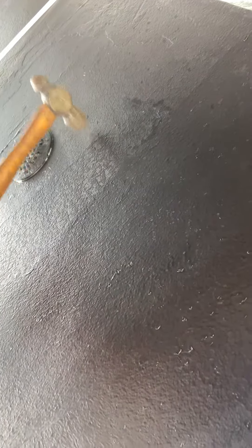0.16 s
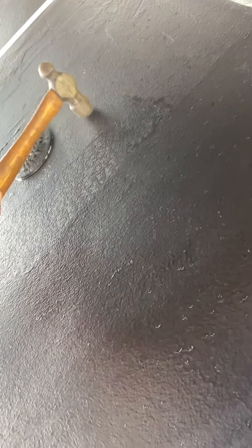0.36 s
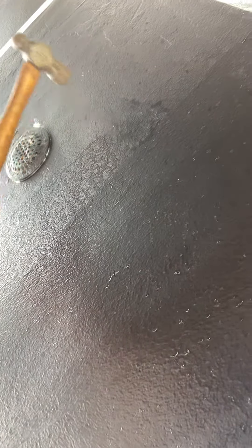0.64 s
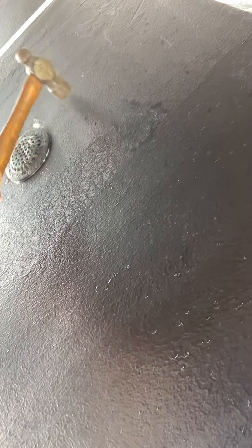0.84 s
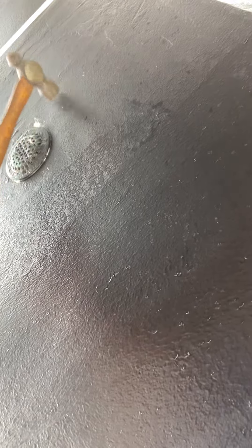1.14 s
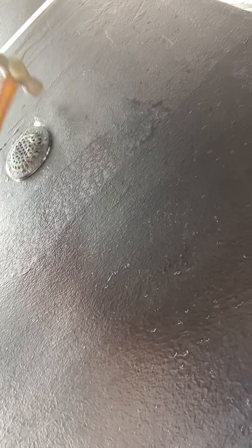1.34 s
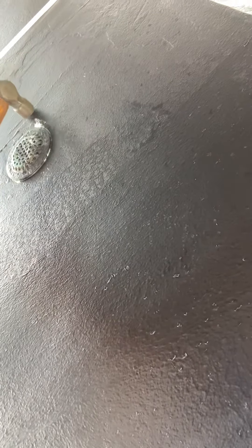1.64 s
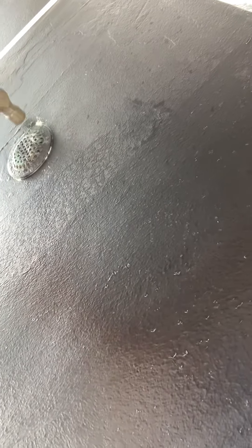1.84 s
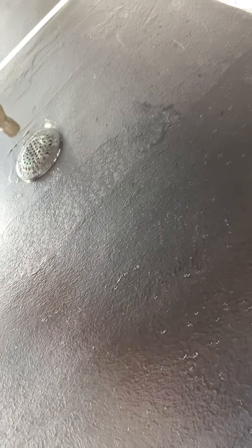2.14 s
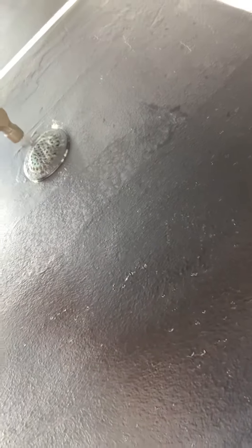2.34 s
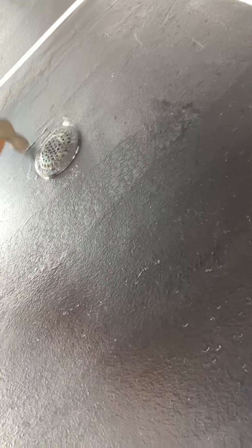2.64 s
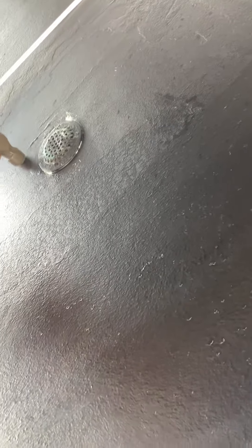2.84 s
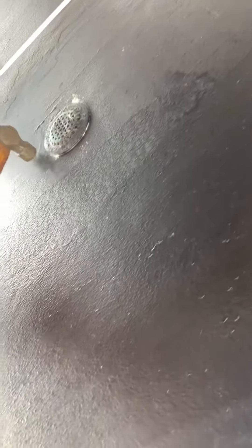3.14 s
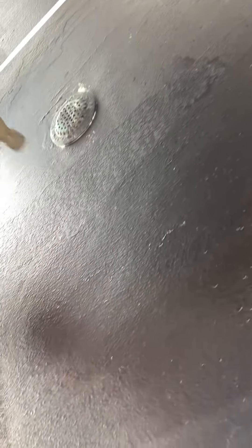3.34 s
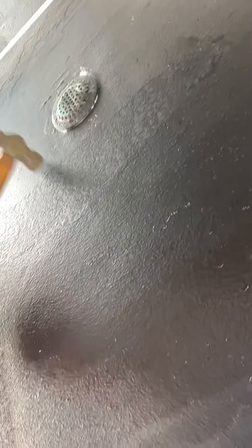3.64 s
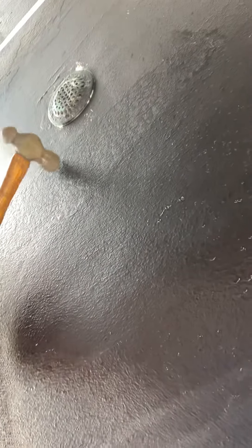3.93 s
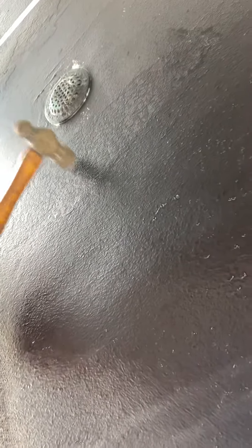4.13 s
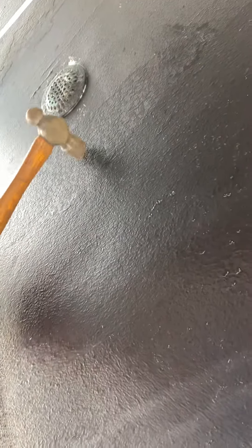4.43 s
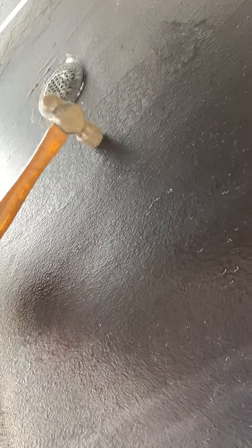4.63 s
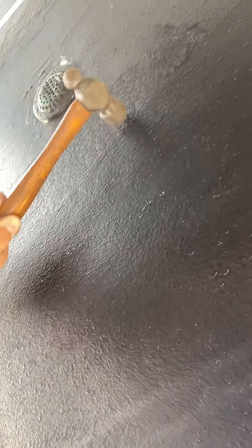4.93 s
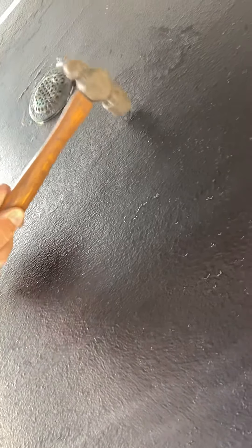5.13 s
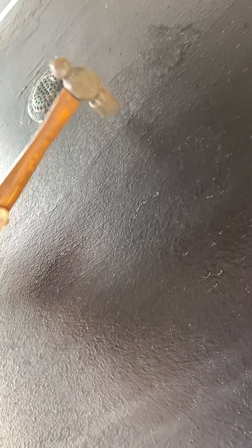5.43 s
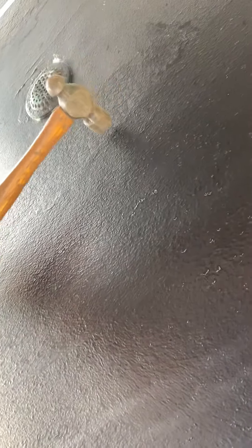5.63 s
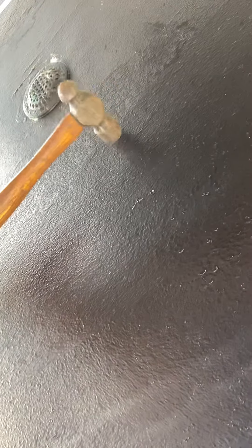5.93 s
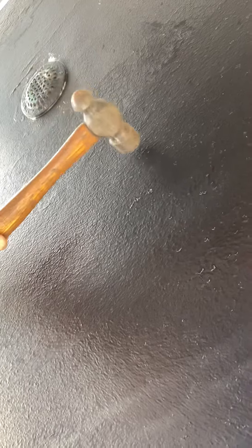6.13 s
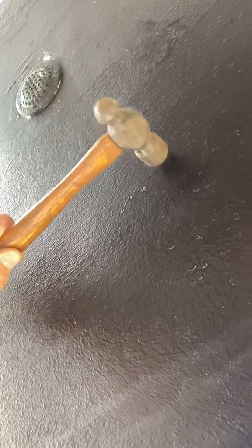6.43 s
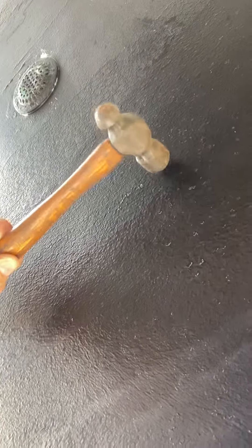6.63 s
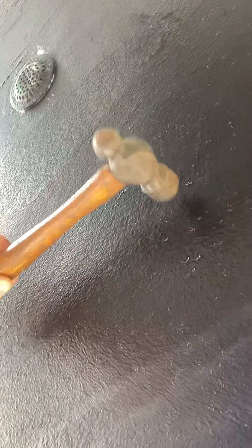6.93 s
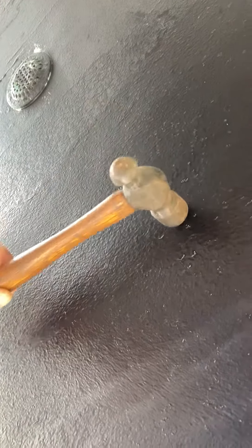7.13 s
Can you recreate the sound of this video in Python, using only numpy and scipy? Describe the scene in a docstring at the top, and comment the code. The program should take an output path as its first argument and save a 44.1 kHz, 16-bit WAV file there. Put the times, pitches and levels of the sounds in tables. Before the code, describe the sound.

A small hammer taps a fiberglass boat hull close to the microphone, about four times a second. The first knocks are dull and hollow on a loose patch, then turn brighter and harder on solid material. Past the middle they grow louder and hollow again, before firming up at the end. The head often bounces lightly after a tap, and the hull and surrounding shed ring briefly. A faint low rumble lies underneath.

```python
"""A small ball-peen hammer sounds out a fibreglass boat hull, close up, about four taps a second.
It starts on a loose, hollow patch of skin, which yields and dulls the knock. Each tap launches a bending
wave (treble first, bass late), the head often drops back, and hull and shed ring briefly. From about
2.4 s it crosses hard, solid laminate, where shorter contact brightens the knock. Near 4.8 s it finds a
second loose patch, and by 7 s it has moved off again. A low rumble lies under it all."""
import sys
import numpy as np
from scipy import signal
from scipy.fft import rfft, irfft
from scipy.io import wavfile
from scipy.ndimage import uniform_filter1d, minimum_filter1d

SR = 44100
rng = np.random.default_rng(int(sys.argv[2]) if len(sys.argv) > 2 else 0)


def store_wav(level_fs):
    """Save 16-bit WAV to argv[1]."""
    pcm = np.round(np.clip(np.atleast_2d(level_fs), -1, 1) * 32767)
    wavfile.write(sys.argv[1], SR, pcm.T.astype(np.int16))


N = 320607
SIZE = 16384  # samples in one knock
HZ = np.maximum(np.arange(SIZE // 2 + 1) * SR / SIZE, 1)
AGE = np.arange(SIZE) / SR
SIDES = np.array([[.5], [-.5]])  # splits a left-right difference between the channels

# The hammer taps. Each row: start in seconds, level in dB, gelcoat tick in dB.
TAPS = [(.0295, 5.5, -17.5), (.2661, 5, -14), (.4754, 1, -12), (.7174, -5.5, 0), (.928, 1.5, -9.5),
        (1.1439, -4.5, -3), (1.3547, -4.5, 0.5), (1.589, 5.5, -15.5), (1.8114, 6, -19),
        (2.0095, 2.5, -32.5), (2.2129, 6, -22.5), (2.4158, 1.5, -36.5), (2.6412, 2, -18.5),
        (2.8395, -3.5, -50), (3.1149, 1.5, -33), (3.3878, 1, -22), (3.641, 1.5, -41.5), (3.9021, 2.5, -33),
        (4.1264, 1, -26), (4.3736, 4, -28), (4.6158, 5.5, -13), (4.8516, 10, -17), (5.1019, 11, -18.5),
        (5.333, 4.5, -22), (5.5814, 7.5, -18), (5.8041, 9, -15.5), (6.0465, 5.5, -13), (6.2778, 4, -11.5),
        (6.5099, 1, -8), (6.7349, 3.5, -13.5), (6.963, 0.5, -10), (7.1705, 1.5, -24)]
# The head drops back on the same spot. Each row: start in seconds, level in dB relative to its tap.
REBOUNDS = [(0.3212, -4), (0.5086, -1.5), (0.957, -3.5), (.977, -10), (1.63, -9), (1.8591, -16.5),
            (2.043, -8), (2.2446, -10), (2.4485, -5), (2.6653, -8.5), (2.86, -5.5), (3.1508, -9),
            (3.9404, -14), (4.157, -13), (5.842, -7), (6.567, -3.5), (6.7945, -10.5), (6.9916, -11.5)]
# The hull under the wandering hammer. Each row: time in seconds, looseness from 0 to 1,
# skin resonance in Hz, boom in dB, clack pitch in Hz, clack in dB.
SPOTS = [(0, 1, 740, 2.5, 630, -2.5), (.9, 0.24, 865, 1.5, 610, 5), (1.6, 0.38, 760, 7, 670, 0),
         (2.42, 0.13, 640, 9.5, 655, 3.5), (2.64, 0.04, 2300, 9.5, 626, 7),
         (2.84, 0.27, 1750, 10, 1550, -0.5), (3.11, 0.06, 1800, 10, 3430, 5),
         (3.39, 0.07, 2500, 3, 3300, 4), (3.64, 0, 1900, 4, 2700, 4), (3.9, 0.1, 1750, 4, 860, 9.5),
         (4.129, 0, 1650, 8.5, 664, 8.5), (4.37, 0.21, 662, 8, 670, 1.5), (4.849, 1, 489, 3, 530, 0.5),
         (6.049, 0.88, 445, 6, 490, 3), (6.499, 0.63, 430, 11, 737, 6), (6.73, 0.31, 680, 11, 700, -0.5),
         (6.96, 0.2, 1025, 5, 553, 9.5), (7.27, 0.13, 980, 2.5, 521, 11)]
# The hammer drifts across the stereo image. Each row: time in seconds, left minus right in dB.
HAMMER_PAN = [(.4, -1.4), (1.8, .6), (6.4, .1), (7.2, -1.1)]
# The broad tone of the hull. Each row: frequency in Hz, gain in dB.
HULL_TONE = [(110, 4), (140, 12.5), (175, 7), (230, 10), (600, 13), (1200, 13.5), (2400, 15), (3500, 14),
             (5300, 13), (7300, 6.5), (10500, 3.5), (13000, 1), (15500, -8)]
# Panel resonances. Each row: centre in Hz, width in Hz, boost in dB.
PANEL_PEAKS = [(224.5, 76.7, 9.5), (284.8, 26, 7), (384.5, 56, 5.5), (512, 23, 2), (693.5, 131, 4.5),
               (910, 58, 6), (1271, 333, 8.5), (1528, 170, 3.5), (2190, 150, 4.5)]
# Waves scattered inside the hull. Each row: frequency in Hz, level in dB, 60 dB decay in seconds.
HULL_SCATTER = [(150, -7.5, 0.228), (303, -1.5, 0.0285), (597, -7.5, 0.12), (1440, -1, 0.014),
                (3940, -5.5, 0.042), (12000, -3.5, 0.0082)]
# The lingering ring of hull and shed. Each row: frequency in Hz, level in dB, 60 dB decay in seconds.
HULL_SHED_RING = [(159.4, 3.5, 0.33), (278, -9, 0.18), (497, -7, 0.18), (880, -15, 0.19),
                  (2130, -9.5, 0.12), (5130, -19, 0.12), (10500, -19, 0.13), (16040, -38, 0.063)]
# Slow modes of the whole hull. Each row: pitch in Hz, level in dB, 60 dB decay in seconds.
HULL_MODES = [(145.6, -4, 0.87), (159.1, 4, 0.34), (232, -1, 0.45), (239.9, -2.5, 0.29), (299, -4.5, 0.27),
              (398, -13, 0.052), (558, -10.5, 0.39), (724, -3, 0.056), (841, -13.5, 0.36)]
# The two microphone ports. Each row: frequency in Hz, left phase lead in radians, left minus right in dB.
MIC_PORTS = [(160, 0, 0), (300, -.15, .3), (440, -.45, 1.5), (560, -.35, 0), (780, -.2, -2.7),
             (1100, .2, 0), (1800, .2, 2), (2500, .75, -1.5), (3200, 1.8, 0), (4300, .8, -4.5),
             (5300, .45, -.3), (7300, 3.1, 0), (11000, 6.6, 0), (15600, 11.6, 0)]
# The colour of the background. Each row: frequency in Hz, relative level in dB.
AIR_TONE = [(15, -41.5), (28, -31), (45, -5.5), (66, 4), (100, -5), (160, -3.5), (230, -9), (350, -19.5),
            (600, -22), (950, -24.5), (1500, -35.5), (2500, -39.5), (4400, -53.5), (7600, -75),
            (14000, -90.5)]
# The rumble sinks, then swells. Each row: time in seconds, gain in dB.
RUMBLE_SWELL = [(0, -0.5), (1.5, -6), (3.8, -4.5), (6.7, 1), (7.27, -1.5)]


def hammer(rebound_cutoff_ratio=.7, rebound_tick_db=-9, rebound_boom_db=-3, trapped=.79, ring_db=1.15):
    """Taps and their softer rebounds, each a falling chirp followed by a rib echo, scatter and ring."""
    ports = np.exp(1j * over_hz(MIC_PORTS, HZ) * SIDES) * undb(over_hz(MIC_PORTS, HZ, axis=2) * SIDES)
    # bending waves speed up as the root of frequency: phase per second of travel time at 1 kHz
    bending = -4j * np.pi * np.sqrt(1000 * HZ)
    early = 1 + rib_echo(bending) + echoes(HULL_SCATTER, likeness=.5, width=.032, build_s=.0012)
    ring = undb(ring_db) * echoes(HULL_SHED_RING, likeness=.57, width=.15, build_s=.0085)
    hum, radiated = hull_hum(), ports * lobes()
    fade = np.interp(AGE, [0, .005, .25, .33], [0, 1, 1, 0])
    lead = 384  # samples of run-up, so the fade-in spares the attack
    out = np.zeros((2, N))
    for k, (s, db, tick_db) in enumerate(TAPS):
        loose, skin_hz, boom_db, clack_hz, clack_db = over_time(SPOTS, s)
        # each setting runs from solid laminate to loose skin
        contact_hz = 3150 * (573 / 3150) ** loose  # loose skin yields: longer contact, less treble
        skin_db = np.interp(loose, [0, 1], [5, 12.5])  # it also resonates more
        tick_db_per_octave = np.interp(loose, [0, 1], [-6, -1.5])  # and slaps with a flatter tick
        travel_s = np.interp(loose, [0, 1], [.0028, .0022])
        hum_db = np.interp(loose, [0, 1], [0, 1])
        # loose skin keeps part of its motion to itself, so it feeds the long ring less
        leak = undb(-trapped * skin_db * hump(skin_hz, octaves=.26))
        late = leak * (ring[k] + undb(hum_db) * hum)
        path = (early[k] + late) * np.exp(bending * travel_s) * radiated[k]
        pan = undb(SIDES * over_time(HAMMER_PAN, s)[0])
        strokes = [(s, db, boom_db, contact_hz, tick_db)]
        for again, drop_db in REBOUNDS:
            if 0 < again - s < .1:
                strokes.append((again, db + drop_db, boom_db + rebound_boom_db,
                                contact_hz * rebound_cutoff_ratio, tick_db + rebound_tick_db))
        for when, level_db, low_db, cutoff_hz, crisp_db in strokes:
            force = blow(cutoff_hz, crisp_db, tick_db_per_octave)
            body = hull_body(low_db, skin_hz, skin_db, clack_hz, clack_db)
            knock = np.roll(irfft(path * causal(force * body)), lead, axis=1)
            add(out, undb(level_db) * pan * fade * knock, when - lead / SR - travel_s / 2)
    return out


def blow(contact_hz, tick_db, tick_db_per_octave):
    """Spectrum of one blow: contact time limits the treble and the hard gelcoat adds a tick."""
    push_power = 1 / (1 + (HZ / contact_hz) ** 6)
    octaves = np.log2(np.maximum(HZ, contact_hz / 2) / 5000)
    tick_power = undb(tick_db + tick_db_per_octave * octaves) ** 2
    return np.sqrt(push_power + tick_power)


def hull_body(boom_db, skin_hz, skin_db, clack_hz, clack_db):
    """The body of the knock: skin and panel resonate, and the struck spot adds its boom and clack."""
    panel_db = sum(db / (1 + (2 * (HZ - hz) / width) ** 2) for hz, width, db in PANEL_PEAKS)
    spot_db = (boom_db * hump(302, octaves=.38)
               + skin_db * hump(skin_hz, octaves=.27)
               + clack_db * hump(clack_hz, octaves=.16))
    radiation = HZ ** 2 / (HZ ** 2 + 50 ** 2)  # the skin radiates little at long wavelengths
    return radiation * undb(over_hz(HULL_TONE, HZ) + panel_db + spot_db)


def rib_echo(bending, echo_db=-13, typical_delay_s=.001812, spread=.3):
    """The nearest stiffener sends the wave back inverted, combing each spot differently."""
    delay_s = typical_delay_s * np.exp(spread * rng.standard_normal((len(TAPS), 1, 1)))
    return -undb(echo_db) * np.exp(bending * delay_s)


def lobes(lobe_db=2, lobe_radians=.62, overtone_db=1.5):
    """Each spot favours its own overtones and radiates them in lobes, shifting stereo balance and phase."""
    balance, phase = lobe_db * ripple(), lobe_radians * ripple()
    overtones = np.array([causal(undb(overtone_db * row)) for row in ripple()])
    return overtones[:, None] * undb(balance[:, None] * SIDES) * np.exp(1j * phase[:, None] * SIDES)


def ripple(count=36):
    """A random curve for each tap, flat below 300 Hz and above 7 kHz; neighbouring spots are alike."""
    knots = np.log(np.geomspace(300, 7000, count))
    heights = uniform_filter1d(rng.standard_normal((len(TAPS), count)), size=2, axis=0) * np.sqrt(2)
    heights[:, [0, -1]] = 0
    return np.array([np.interp(np.log(HZ), knots, row) for row in heights])


def hull_hum():
    """Spectrum of the slow modes that hum on after the knock."""
    return sum(undb(db) / (1 + 2j * np.pi * (HZ - hz) * t60 / np.log(1000)) for hz, db, t60 in HULL_MODES)


def echoes(table, likeness, width, build_s):
    """Dense decaying echoes for each tap, as stereo spectra; neighbouring spots echo alike."""
    noise = rng.standard_normal((len(TAPS), 2, SIZE))
    for k in range(1, len(TAPS)):
        noise[k] = likeness * noise[k - 1] + np.sqrt(1 - likeness ** 2) * noise[k]
    spectra, tail = rfft(noise), 0
    centres = np.geomspace(125, 16000, 12)
    build = 1 - np.exp(-(AGE / build_s) ** 2)
    for hz, weights in zip(centres, np.eye(len(centres))):
        envelope = build * undb(-60 * AGE / over_hz(table, hz, axis=2))
        band = irfft(spectra * np.interp(np.log(HZ), np.log(centres), weights))
        tail = tail + band * envelope * undb(over_hz(table, hz)) / np.linalg.norm(envelope)
    mid, side = np.split(rfft(tail), 2, axis=1)
    apart = np.minimum(width * HZ / 1000, 1)  # long waves reach both ports alike
    return (mid + apart * side * 2 * SIDES) / np.sqrt(1 + apart ** 2)


def background(base_db=-41, bass_width=.079, waver_db=2, rush_boost_db=6, rush_db_per_s=-1.31):
    """A low, slowly wavering rumble with a soft rush above it that fades steadily."""
    hz = np.maximum(np.arange(N // 2 + 1) * SR / N, 1)
    t = np.arange(N) / SR
    mid, side = rfft(rng.standard_normal((2, N))) * undb(over_hz(AIR_TONE, hz))
    air = mid + side * np.clip(hz / 3000, bass_width, 1) * 2 * SIDES
    air *= undb(base_db) / irfft(mid, N).std()
    lowpass = 1 / (1 + (hz / 320) ** 2)
    waver = np.interp(t, np.linspace(0, N / SR, 60), rng.standard_normal(60))
    rumble = irfft(air * lowpass, N) * undb(waver_db * waver + over_time(RUMBLE_SWELL, t)[0])
    rush = irfft(air * (1 - lowpass), N) * undb(rush_boost_db + rush_db_per_s * t)
    return rumble + rush


def undb(db):
    """Decibels to gain."""
    return 10 ** (np.asarray(db) / 20)


def over_hz(table, hz, axis=1):
    """One column of a table, joined on a log-frequency axis."""
    rows = np.array(table)
    return np.interp(np.log(hz), np.log(rows[:, 0]), rows[:, axis])


def over_time(table, s):
    """Every value column of a table at time s, gliding from row to row."""
    times, *columns = np.transpose(table)
    return [np.interp(s, times, column) for column in columns]


def hump(hz, octaves):
    """Bell curve around a frequency."""
    return np.exp(-.5 * (np.log2(HZ / hz) / octaves) ** 2)


def causal(gain):
    """Minimum-phase response with the given gain: it rings only after the blow."""
    cepstrum = irfft(np.log(gain))
    cepstrum[1:SIZE // 2] *= 2
    cepstrum[SIZE // 2 + 1:] = 0
    return np.exp(rfft(cepstrum))


def add(out, sound, s):
    """Mix a sound in at time s."""
    start = max(int(s * SR), 0)
    out[:, start:start + sound.shape[1]] += sound[:, :N - start]


def scene():
    """Hammer on the hull over the background."""
    return hammer() + background()


def record(dry):
    """A phone's look-ahead limiter holds the peaks, and the very top is cut."""
    ceiling, top_hz = .9, 16900
    gain = ceiling / np.maximum(np.abs(dry).max(axis=0), ceiling)
    gain = uniform_filter1d(minimum_filter1d(gain, size=61), size=61)
    return signal.sosfilt(signal.ellip(8, .2, 70, top_hz, fs=SR, output="sos"), dry * gain)


dry = scene()
out = record(dry)
store_wav(out)
```